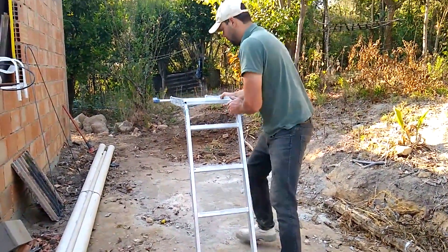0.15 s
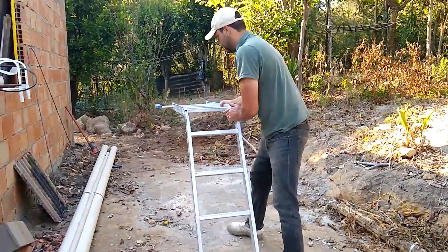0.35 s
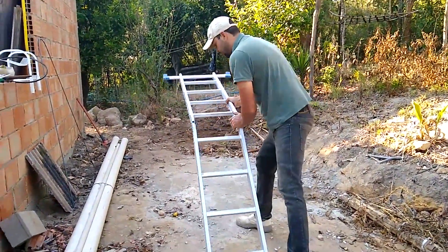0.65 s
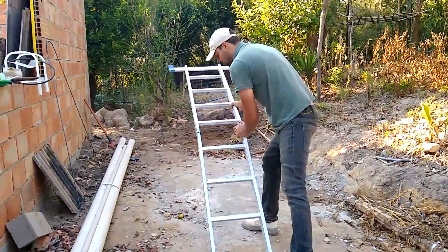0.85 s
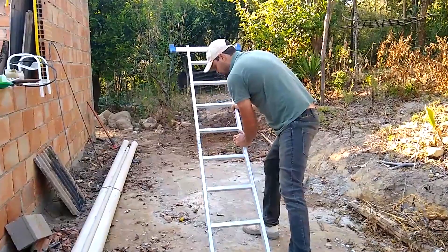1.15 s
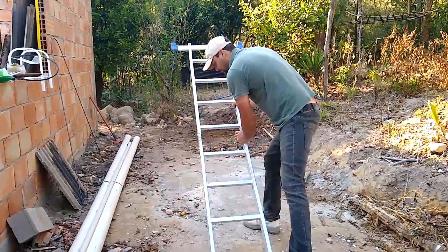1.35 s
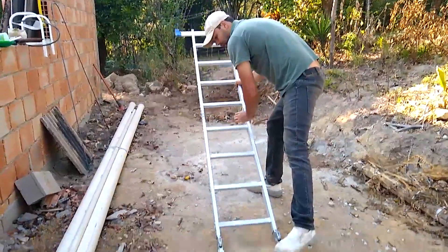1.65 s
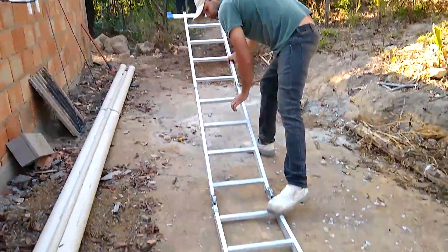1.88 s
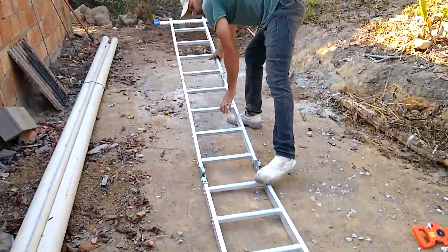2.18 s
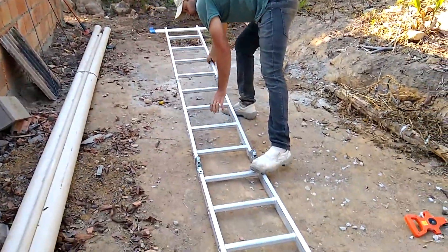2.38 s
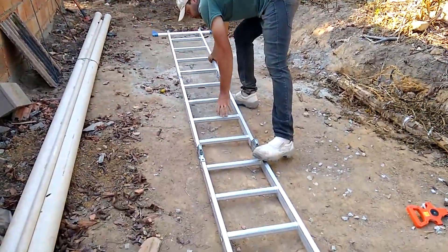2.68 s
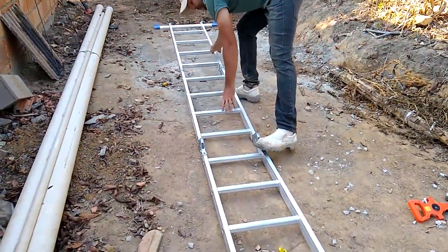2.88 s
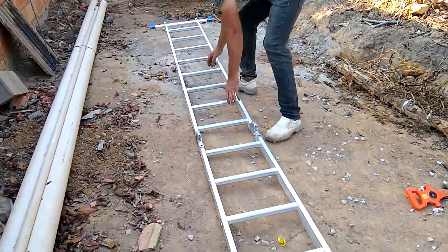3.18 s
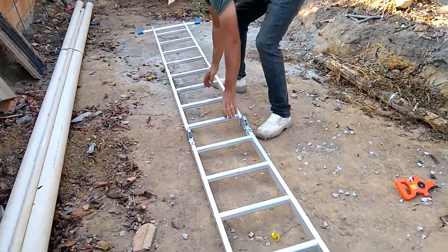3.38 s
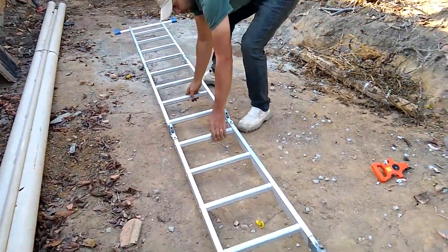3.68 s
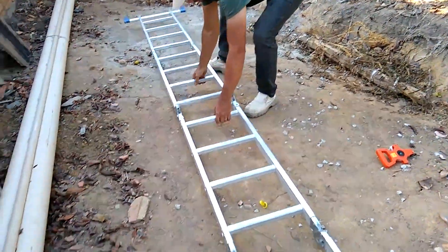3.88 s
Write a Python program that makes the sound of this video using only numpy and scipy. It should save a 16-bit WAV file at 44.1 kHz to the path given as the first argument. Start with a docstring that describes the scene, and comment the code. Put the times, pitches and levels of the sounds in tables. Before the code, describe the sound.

A hinged aluminium ladder is unfolded outdoors, with sharp, ringing metal clacks, lighter rattles and scrapes, and faint steps on dirt.

```python
"""A hinged aluminium ladder is opened out and laid on bare ground in a yard, a few metres away.
The joints scrape, then the hinges snap at 0.5 s: metal chatter that rings the hollow rails.
At 1.2 s a section lands, and from then on the ground damps the ring. Shoes tread and scuff the dirt.
A loud clack at 2.5 s leads into rattles, scrapes and squeaks, and a last one falls at 4 s.
Throughout, a brick wall answers over faint outdoor air."""
import sys
import numpy as np
from scipy import signal
from scipy.fft import rfft, irfft
from scipy.io import wavfile

SR = 44100
rng = np.random.default_rng(int(sys.argv[2]) if len(sys.argv) > 2 else 0)


def write(x):
    x = np.atleast_2d(x).T
    wavfile.write(sys.argv[1], SR, np.round(np.clip(x, -1, 1) * 32767).astype(np.int16))


N = 177782
EVENT_T = np.arange(int(0.5 * SR)) / SR
SCENE_T = np.arange(N) / SR
SIDES = np.array([[1], [-1]])


def undb(db):
    """Decibels to gain."""
    return 10 ** (np.asarray(db) / 20)


def unit(x):
    """Scale to rms 1."""
    return x / np.sqrt(np.mean(x ** 2))


def fade(t60_s):
    """Exponential decay, 60 dB in t60_s."""
    return np.exp(-np.log(1000) * EVENT_T / t60_s)


def arch(length_s):
    """Half-sine envelope."""
    return np.sin(np.pi * np.minimum(EVENT_T / length_s, 1))


def add(out, start_s, x):
    """Mix x into the stereo output at start_s."""
    i = int(start_s * SR)
    out[:, i:i + x.shape[1]] += x[:, :N - i]


def colour(x, points, size=2048):
    """Minimum-phase filter through (Hz, dB) points."""
    hz, db = np.transpose(points)
    bins_hz = np.arange(size // 2 + 1) * SR / size
    log_gain = np.log(undb(np.interp(np.log(bins_hz + 1), np.log(hz), db)))
    cepstrum = irfft(log_gain)[:size // 2]
    response = irfft(np.exp(2 * rfft(cepstrum, size) - cepstrum[0]))[:size // 2]
    return signal.fftconvolve(x, response[None], axes=1)[:, :x.shape[1]]


def pan(x, points):
    """Stereo balance through (Hz, left minus right dB) points."""
    left = colour(x[:1], [(hz, db / 2) for hz, db in points])
    right = colour(x[1:], [(hz, -db / 2) for hz, db in points])
    return np.vstack([left, right])


def stereo_noise(samples, apart_hz=1300, bass_spread=0.55):
    """Noise at two close microphones: mostly alike in the bass, unrelated in the treble."""
    mid, side = rng.standard_normal((2, samples))
    high = signal.sosfilt(signal.butter(1, apart_hz, "high", fs=SR, output="sos"), side)
    return (mid + SIDES * (high + bass_spread * (side - high))) / np.sqrt(2)


def flicker(samples, rate_hz, depth_db):
    """Random gain, rms 1, gliding to a new value rate_hz times a second."""
    knots = rng.standard_normal(samples // 8)
    wander = np.interp(np.arange(samples) * rate_hz / SR, np.arange(len(knots)), knots)
    return unit(undb(depth_db * wander))


def ringing(hz, t60_s):
    """One decaying sine per mode, in random phase."""
    phase = rng.uniform(0, 2 * np.pi, len(hz))
    omega, loss, phase = np.float32([2 * np.pi * hz, np.log(1000) / t60_s, phase])[:, :, None]
    t = np.float32(EVENT_T)
    return np.sin(omega * t + phase) * np.exp(-loss * t)


# Strongest rail modes. Each row: frequency in Hz, level in dB.
RAIL_MODES = [(447, -10.5), (794, 0.5), (904, -13), (975, -4), (1045, 3.5), (1378, -12), (1525, 1.5),
              (1642, -8), (1830, -2), (2033, 7), (2363, -6.5), (2529, 0), (2735, -7), (3591, 1.5),
              (3709, -2), (3879, 0.5), (3902, -0.5), (4124, -5.5), (4313, -2.5), (4561, -3), (4938, -4),
              (5348, -6), (5940, -8), (6355, 0.5), (6385, -3), (7130, 1), (7324, 0), (8732, -11.5),
              (10214, -1), (11040, -4.5)]
# Spectrum of a blow. Each row: frequency in Hz, gain in dB.
BLOW_EQ = [(40, -23), (150, -11.5), (330, -10), (520, -2), (900, 5), (1230, -0.5), (1550, 0.5), (2150, -5),
           (2600, 0.5), (4300, 1.5), (8300, -0.5), (10500, 2), (13000, -5.5), (16000, -20.5)]
# Blows on hinges and rails. Each row: start in seconds, level in dB, bass in dB, treble in dB,
# ring in dB, resonance of the struck spot in Hz, its strength (0 = none).
BLOWS = [(0.016, -33.5, 1, 5.5, -15.5, 2630, 6), (0.088, -38.5, -21, 4.5, -20, 7300, -0.5),
         (0.33, -42.5, 8.5, -2.5, -25, 1230, 2.5), (0.39, -35, -4.5, 12.5, -18, 7340, 1.3),
         (.485, -5.5, -8.5, 0.5, -14.5, 1610, 1.1), (.519, -6, -11.5, -.5, -9, 2035, 0.73),
         (0.742, -47.5, 6, -2.5, -18, 10800, 3), (0.852, -55, 2, 1, -7.5, 10850, 2),
         (0.877, -45.5, -1.5, 6, -39, 3050, 1), (0.961, -49, 1.5, 6.5, -6, 4400, 1),
         (1.185, -14.5, 2.5, 2, -14, 720, .5), (1.203, -10.5, -12, 0.5, -7, 4500, 0.25),
         (1.276, -33.5, -28, 6.5, -25, 1355, 1.9), (1.307, -36.5, -5, -2.5, -7, 1470, 0),
         (1.876, -49, -4, 6, -11, 1605, -0.5), (2.053, -54.5, -1.5, 3.5, -2.5, 10580, 0.1),
         (2.125, -48, -5, 2.5, -8, 640, -2.5), (2.274, -46.5, -9, -0.5, -11.5, 10230, -0.1),
         (2.328, -50.5, -5.5, -2.5, -9, 10800, 0.2), (2.493, -14.5, -4, 0, -8.5, 1510, 3),
         (2.509, -12.5, -5.5, .5, -8, 1066, 1.5), (2.57, -23.5, -21, 2.5, -10.5, 4600, 0),
         (2.652, -32.5, -1, 9, -15.5, 4350, 0), (2.693, -29, -0.5, 8.5, -18, 456, 3),
         (2.727, -33.5, -3, 5.5, -38, 1640, 2.1), (2.992, -28, -10, 2, -7.5, 2580, .2),
         (3.028, -29, -1.5, -2.5, -20.5, 800, -0.5), (3.063, -30, -7.5, -3.5, -11, 767, 5),
         (3.371, -33, 3, -1.5, -15.5, 460, 1), (3.426, -27.5, -3, 4.5, -19, 7680, 1.5),
         (3.435, -28.5, -9.5, 3.5, -20, 5850, 1.5), (3.445, -30.5, -14.5, 3.5, -15, 4240, 3.5),
         (3.745, -47.5, -8.5, 5, -17, 1600, 6), (3.812, -25, 2.5, -5.5, -35, 680, 1),
         (3.882, -28.5, -4.5, 9.5, -46, 7700, 0.75), (3.951, -43, -10, 0, 8, 1560, 3.5),
         (3.977, -11.5, -0.5, -2.5, -7, 10300, 1.6)]
LANDING_S = 1.1
HELD_T60_S, GROUNDED_T60_S = 0.4, 0.23
HELD_PAN_DB, GROUNDED_PAN_DB = -5, -7.5


def clacks(weak_count=520, strong_db=-20.5, weak_db=-3, buzz_db=-8, uneven_db=3.0,
           rise_s=0.0058, hold_s=0.0036, chatter_t60_s=0.059, spot_q=9):
    """Loose metal chatters briefly and leaves the rails ringing in many modes while the joints buzz."""
    base_t60_s = 1 / 3
    strong_hz, mode_db = np.transpose(RAIL_MODES)
    weak_hz = rng.uniform(np.sqrt(380), np.sqrt(15500), weak_count) ** 2
    hz = np.r_[strong_hz, weak_hz]
    modes = ringing(hz, base_t60_s * np.interp(hz, [2000, 3300, 8000], [1.083, 1, 0.45]))
    weak_gain = undb(weak_db) * np.sqrt(2 / weak_count) * unit(weak_hz ** 0.25)
    # strong modes and long waves reach both microphones mostly alike
    shared = np.r_[np.full(len(strong_hz), 0.75), 1 / (1 + (weak_hz / 1200) ** 2)]
    attack = np.minimum(EVENT_T / rise_s, 1) ** 2  # the play in the joint closes
    contact = np.minimum(fade(chatter_t60_s) * undb(60 * hold_s / chatter_t60_s), 1)
    bands_hz = np.geomspace(400, 16000, 48)
    out = np.zeros((2, N))
    for start_s, db, bass_db, treble_db, ring_db, spot_hz, spot_gain in BLOWS:
        held = start_s < LANDING_S
        t60_s, pan_db = (HELD_T60_S, HELD_PAN_DB) if held else (GROUNDED_T60_S, GROUNDED_PAN_DB)
        # a damped rail loses its clear tones first
        gain = np.r_[undb(mode_db + strong_db) * np.sqrt(t60_s / base_t60_s), weak_gain]
        common = np.sqrt(shared) * rng.choice([-1, 1], len(hz))
        drive = common + np.sqrt(1 - shared) * rng.standard_normal((2, len(hz)))
        ring = np.float32(drive * gain) @ modes * fade(t60_s) / fade(base_t60_s)
        chatter = stereo_noise(len(EVENT_T)) * flicker(len(EVENT_T), rate_hz=700, depth_db=0.83)
        buzz = undb(buzz_db) * chatter * fade(t60_s)
        blow = attack * (chatter * contact + undb(ring_db) * (ring + buzz))
        # each contact point has its own resonance and uneven colour
        blow += spot_gain * signal.lfilter(*signal.iirpeak(spot_hz, spot_q, fs=SR), blow)
        tilt_db = np.interp(bands_hz, [1006, 1916, 3700, 7200], [bass_db, 0, 0, treble_db])
        ripple_db = uneven_db * rng.uniform(-1, 1, len(bands_hz))
        blow = colour(blow, np.c_[bands_hz, tilt_db + ripple_db])
        add(out, start_s, undb(db) * pan(blow, [(3000, 0.0058), (7000, pan_db)]))
    return colour(out, BLOW_EQ)


# Spectrum of sliding metal. Each row: frequency in Hz, gain in dB.
SCRAPE_EQ = [(50, -11), (120, 0), (300, 1), (600, 4), (950, 6), (1200, 3), (1600, 8), (2200, -1.5),
             (2600, 5), (4000, 5), (7500, 1.5), (11000, 6.5), (13000, -6), (16000, -7.5)]
# Pushes on joints and rails. Each row: start in seconds, length in seconds, level in dB, treble in dB.
PUSHES = [(0.024, 0.037, -58.5, -22), (0.133, 0.018, -62, -20), (0.205, 0.094, -65, -11),
          (0.302, 0.026, -57.5, 2.5), (0.345, 0.015, -51, 5), (0.402, 0.033, -51.5, 1.5),
          (0.446, 0.082, -38.5, -13.5), (.69, 0.077, -53.5, -4), (.88, 0.14, -57, -1.5),
          (1.069, 0.028, -51, -10.5), (1.138, 0.024, -61.5, -0.5), (1.241, 0.073, -45.5, -0.5),
          (1.632, 0.68, -71, -0.5), (2.085, 0.1, -65, -2.5), (2.182, 0.068, -63.5, 2),
          (2.291, 0.08, -69, 1), (2.522, .05, -42, -19.5), (2.665, 0.031, -42.5, 3.5),
          (2.909, 0.048, -69, 3), (3.059, 0.03, -44.5, -26.5), (3.14, 0.049, -54.5, -12),
          (3.367, 0.11, -50, -8), (3.689, 0.059, -61.5, 3.5), (3.735, 0.23, -47, -5),
          (3.77, 0.059, -39, -9.5), (3.985, .04, -32, -27)]


def scrapes(attack_s=0.016, release_t60_s=0.21, fidget_db=-73, rail_db=-10, rail_t60_s=0.024, pan_db=-7):
    """Dense uneven slips in the joints sound the hand-damped rails; harder contact adds treble."""
    body_power = treble_power = undb(fidget_db) ** 2  # the hands are never quite still
    for start_s, length_s, db, treble_db in PUSHES:
        attack = np.clip((SCENE_T - start_s) / attack_s, 0, 1)
        release = np.exp(-np.log(1000) * np.maximum(SCENE_T - start_s - length_s, 0) / release_t60_s)
        power = (undb(db) * attack * release) ** 2
        body_power = body_power + power
        treble_power = treble_power + power * undb(treble_db) ** 2
    slips = stereo_noise(N) * flicker(N, rate_hz=340, depth_db=1.5)
    slips *= flicker(N, rate_hz=70, depth_db=3.5)
    hz, mode_db = np.transpose(RAIL_MODES)
    modes = ringing(hz, np.full(len(hz), rail_t60_s))
    rails = unit(undb(mode_db) @ modes) / np.sqrt(len(EVENT_T))
    slips += undb(rail_db) * signal.fftconvolve(slips, rails[None], axes=1)[:, :N]
    body = signal.sosfilt(signal.butter(1, 3000, fs=SR, output="sos"), slips)
    rub = np.sqrt(body_power) * body + np.sqrt(treble_power) * (slips - body)
    return pan(colour(rub, SCRAPE_EQ), [(3000, 0), (7000, pan_db)])


# Hinge squeaks. Each row: start in seconds, length in seconds, pitch in Hz, level in dB.
SQUEAKS = [(0.248, 0.062, 1608, -66), (0.239, 0.05, 2577, -66.5), (2.6, 0.081, 1620, -51),
           (3.147, 0.045, 1634, -59.5), (3.224, 0.035, 1643, -70.5), (3.774, 0.01, 1560, -51),
           (3.953, 0.032, 1635, -43.5)]


def squeaks():
    """A dry pivot sings briefly on a wavering pitch."""
    out = np.zeros((2, N))
    for start_s, length_s, hz, db in SQUEAKS:
        pitch_hz = hz * flicker(len(EVENT_T), rate_hz=350, depth_db=0.17)
        tone = unit(np.sin(2 * np.pi * np.cumsum(pitch_hz) / SR))
        add(out, start_s, undb(db) * arch(length_s) * tone[None])
    return out


# Shoes and ladder feet on the ground. Each row: start in seconds, level in dB, upper band edge in Hz,
# T60 in seconds, left minus right in dB.
THUDS = [(.062, -45, 410, 0.047, 0), (0.338, -55.5, 206, 0.15, 0), (0.371, -53.5, 161, 0.084, -1),
         (0.486, -46, 133, .12, -22.5), (0.526, -47, 90.3, 0.15, -23), (1.747, -63.5, 264.4, 0.11, 1.5),
         (1.819, -75.5, 159.5, 0.16, 1), (2.135, -55, 646, 0.022, 4), (2.192, -63.5, 252, 0.19, 2),
         (2.829, -54.5, 318, 0.046, 4), (3.069, -60, 223, 0.1, -2), (3.179, -41.5, 342, 0.033, 2),
         (3.196, -56, 257, 0.088, 3), (3.813, -39, 506, 0.029, -2)]


def thuds(rise_s=0.0035, press_db=1, crumble_db=-3):
    """One soft push on packed earth, then the soil settles: only the bass survives."""
    out = np.zeros((2, N))
    for start_s, db, top_hz, t60_s, pan_db in THUDS:
        earth = signal.butter(2, [top_hz / 2.5, top_hz], "band", fs=SR, output="sos")
        press = signal.sosfilt(earth, signal.unit_impulse(len(EVENT_T)))
        soil = unit(signal.sosfilt(earth, stereo_noise(len(EVENT_T), bass_spread=0.16)))
        crumble = soil * fade(t60_s) * np.minimum(EVENT_T / rise_s, 1)
        thud = undb(press_db) * press / np.abs(press).max() + undb(crumble_db) * crumble
        add(out, start_s, undb(db + SIDES * pan_db / 2) * thud)
    return out


# Drags over dirt. Each row: start in seconds, length in seconds, level in dB, centre in Hz,
# width in octaves.
SCUFFS = [(0.323, 0.041, -52, 810, 2), (1.301, 0.047, -48, 1485, 0.38), (1.843, 0.066, -55.5, 1600, 1.03),
          (2.196, 0.036, -66.5, 1310, 1.9), (2.429, 0.063, -58, 708, 0.98), (2.449, .05, -54, 1500, 2.5),
          (2.674, 0.042, -50.5, 454, 0.27), (3.035, 0.082, -51.5, 770, 0.52),
          (3.137, 0.077, -58, 2240, 3.1), (3.402, 0.038, -53, 447, 0.34)]


def scuffs():
    """A sole or a hollow rail drags over grit: a short grainy swish."""
    out = np.zeros((2, N))
    for start_s, length_s, db, centre_hz, octaves in SCUFFS:
        grit = stereo_noise(len(EVENT_T)) * flicker(len(EVENT_T), rate_hz=920, depth_db=4.0)
        edges_hz = centre_hz * 2 ** (np.array([-0.5, 0.5]) * octaves)
        swish = signal.sosfilt(signal.butter(2, edges_hz, "band", fs=SR, output="sos"), grit)
        add(out, start_s, undb(db) * unit(swish) * arch(length_s))
    return out


def yard_echo(x, delay_s=0.014, wall_db=-16, wall_t60_s=0.016, tail_db=-23, tail_t60_s=0.17):
    """The brick wall returns a smeared echo; ground and bushes scatter a faint tail."""
    wall = undb(wall_db) * unit(stereo_noise(len(EVENT_T)) * fade(wall_t60_s))
    tail = undb(tail_db) * unit(stereo_noise(len(EVENT_T)) * fade(tail_t60_s))
    response = colour((wall + tail) / np.sqrt(len(EVENT_T)), [(2000, 9.5), (12000, -33.5)])
    out = np.zeros((2, N))
    add(out, delay_s, signal.fftconvolve(x, response, axes=1)[:, :N])
    return out


# Spectrum of the outdoor air. Each row: frequency in Hz, gain in dB.
AIR_EQ = [(18, -54), (30, -25.5), (103, -1.5), (134, -14), (437, -9.5), (632, -16), (801, -9), (913, -21.5),
          (1430, -9), (1720, -13), (16000, -24.5)]


def air(level_db=-70.5):
    """Faint outdoor hush that wavers a little."""
    hush = pan(colour(stereo_noise(N), AIR_EQ), [(3000, 1.0), (8000, -3)])
    return undb(level_db) * unit(hush) * flicker(N, rate_hz=7.3, depth_db=1)


# Microphone balance. Each row: frequency in Hz, left minus right in dB.
MIC_BALANCE = [(100, -0.5), (700, -3), (1300, -0.5), (2400, 2.5), (4400, 1), (8000, -0.5), (15000, -6)]


def scene():
    """Ladder and feet, their echo and the open air."""
    direct = clacks() + scrapes() + squeaks() + thuds() + scuffs()
    return pan(direct + yard_echo(direct) + air(), MIC_BALANCE)


def record(dry):
    """The phone rounds the highest peaks and cuts the top above 15.9 kHz."""
    lowpass = signal.ellip(8, 0.2, 70, 15900, fs=SR, output="sos")
    return signal.sosfilt(lowpass, np.tanh(dry))


dry = scene()
out = record(dry)
write(out)
```